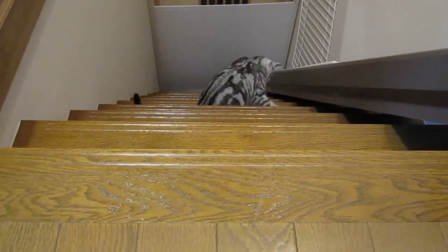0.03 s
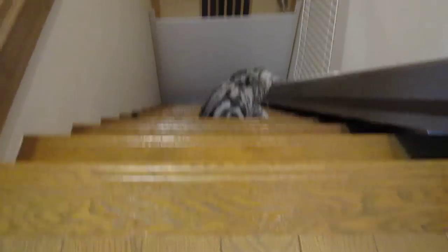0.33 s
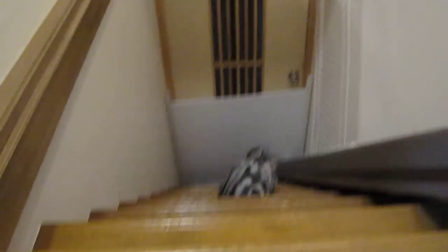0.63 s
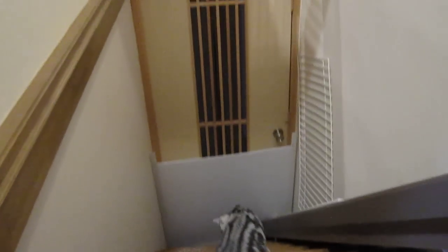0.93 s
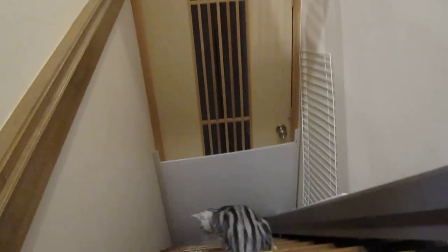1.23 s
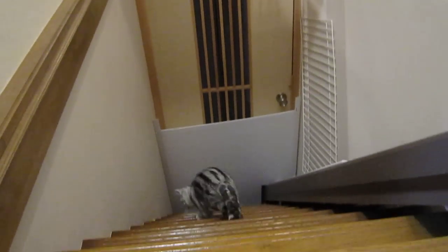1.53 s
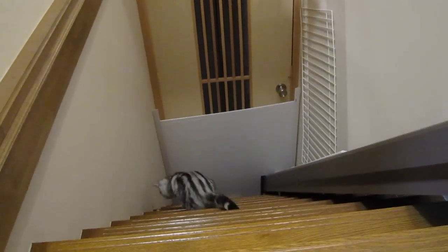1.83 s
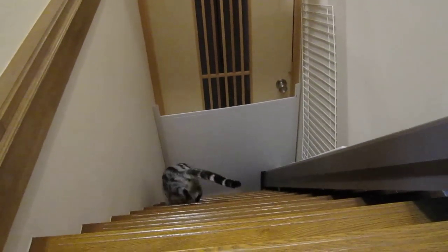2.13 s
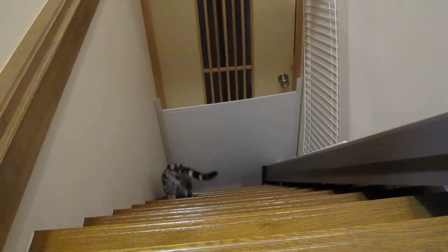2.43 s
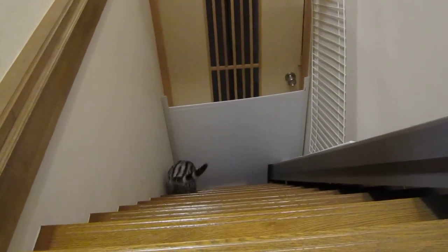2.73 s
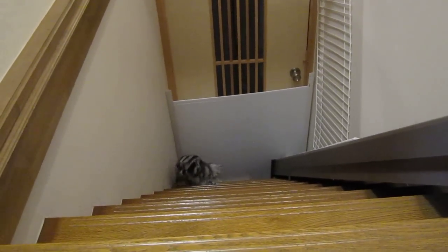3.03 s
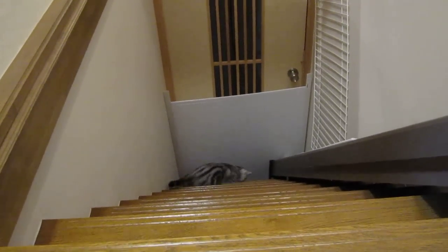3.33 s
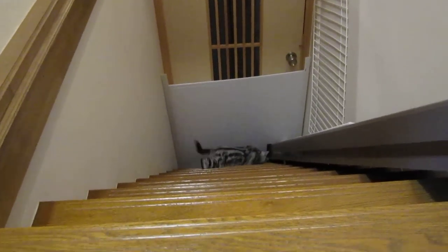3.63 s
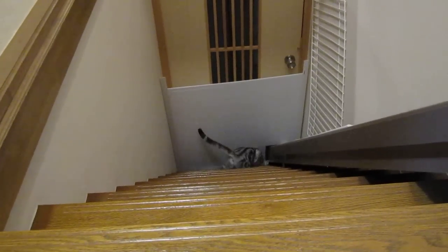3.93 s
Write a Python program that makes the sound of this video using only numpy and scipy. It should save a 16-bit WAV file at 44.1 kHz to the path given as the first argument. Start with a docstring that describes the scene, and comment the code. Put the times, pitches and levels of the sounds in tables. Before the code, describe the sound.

Sharp clicks of a little hard object tumbling down a wooden staircase, over a low hum.

```python
"""Quiet room air and a low hum that sinks in pitch, heard from the top of a wooden staircase.
A cat scuffs and pads; a low handling bump and a few dry ticks sound close by. A small hard object
bounces down the stairs: each click comes weakly round the stair edges, then strongly off the walls,
with the object's thin high ring and a stairwell tail."""
import sys
import numpy as np
from scipy import signal
from scipy.fft import rfft, irfft, next_fast_len
from scipy.io import wavfile

SR = 44100
rng = np.random.default_rng(int(sys.argv[2]) if len(sys.argv) > 2 else 0)


def to_wav(s):
    """Save 16-bit WAV."""
    ch = np.atleast_2d(s).T  # columns
    pcm = np.round(np.clip(ch, -1, 1) * 32767)  # PCM
    wavfile.write(sys.argv[1], SR, pcm.astype(np.int16))


N = 176400


def undb(db):
    return 10 ** (np.asarray(db) / 20)


def unit(x):
    """Scale to energy 1."""
    return x / np.sqrt(np.sum(x ** 2) + 1e-18)


def curve(hz, points):
    """Read (Hz, value) points on a log-frequency axis."""
    knot_hz, values = np.array(points, float).T
    return np.interp(np.log(np.maximum(hz, 1)), np.log(knot_hz), values)


def eq(x, gain_db):
    """Minimum-phase EQ that follows gain_db(Hz)."""
    n = 2 * next_fast_len(len(x))
    hz = np.arange(n // 2 + 1) * SR / n
    cepstrum = irfft(np.log(undb(gain_db(hz))), n)
    cepstrum[1:n // 2] *= 2
    cepstrum[n // 2 + 1:] = 0
    return irfft(rfft(x, n) * np.exp(rfft(cepstrum)), n)[:len(x)]


def noise_band(n, hz, octaves):
    """Noise of rms 1 in a bell-shaped band."""
    f = np.maximum(np.arange(n // 2 + 1) * SR / n, 1)
    bell = np.exp(-.5 * (np.log2(f / hz) / octaves) ** 2)
    return unit(irfft(rfft(rng.standard_normal(n)) * bell, n)) * np.sqrt(n)


def modes(table, t):
    """Decaying sines from (Hz, dB, t60) rows."""
    return sum(undb(db) * np.sin(2 * np.pi * hz * t) * np.exp(-np.log(1000) * t / t60)
               for hz, db, t60 in table)


def add(out, start, x):
    """Mix x in at start seconds."""
    i = int(start * SR)
    out[i:i + len(x)] += x[:N - i]


# Tone of the room air: (frequency [Hz], relative level [dB])
AIR_EQ = [(110, -22), (180, -15.5), (506, -18.5), (2110, -22.5), (16000, -44.5)]

def room_air():
    """A quiet noise bed with one soft stairwell resonance."""
    air = unit(eq(rng.standard_normal(N), lambda f: curve(f, AIR_EQ))) * np.sqrt(N)
    return undb(-52.5) * air + undb(-58) * noise_band(N, hz=258, octaves=0.14)


# Glide and swells of the hum: (time [s], pitch [Hz], level [dB])
HUM = [(0, 61.54, -44), (.6, 57.24, -52.5), (1.649, 46.2, -39), (2.169, 42.34, -43), (2.401, 41.34, -36.5),
       (2.65, 39.44, -39.5), (2.95, 36.14, -32.5), (3.5, 34.9, -41), (4., 40.7, -31)]
# Fade of the rumble: (time [s], level [dB])
RUMBLE = [(2.3, -52), (2.55, -58.5)]

def hum():
    """A wavering low tone sinks, then lifts at the end; its octave and a rumble drop back midway."""
    t = np.arange(N) / SR
    times, hz, db = np.array(HUM).T
    phase = 2 * np.pi * np.cumsum(np.interp(t, times, hz)) / SR
    waver_db = 1.6 * noise_band(N, hz=7.4, octaves=1)
    tone = np.sqrt(2) * undb(np.interp(t, times, db) + waver_db) * np.sin(phase)
    rumble = noise_band(N, hz=82, octaves=1) + np.sin(2 * phase)
    return tone + undb(np.interp(t, *np.array(RUMBLE).T)) * rumble


# Reverb time of the stairwell: (frequency [Hz], t60 [s])
STAIRWELL_T60 = [(200, 0.31), (600, 0.45), (1400, 0.48), (4000, 0.37), (7000, 0.4), (10000, .31),
                 (15000, 0.16)]

def stairwell(t, rise_s=0.0038):
    """Diffuse tail of energy 1: it builds up, then the top dies first."""
    f = np.arange(len(t) // 2 + 1) * SR / len(t)
    spectrum = rfft(rng.standard_normal(len(t)))
    edges = np.r_[0, np.geomspace(200, SR / 2, 24)]
    tail = np.zeros(len(t))
    for low, high in zip(edges, edges[1:]):
        t60 = curve((low + high) / 2, STAIRWELL_T60)
        tail += irfft(spectrum * (f >= low) * (f < high), len(t)) * np.exp(-np.log(1000) * t / t60)
    return unit(tail * (1 - np.exp(-t / rise_s)))


# The cat's scuffs: (peak time [s], level [dB], centre [Hz], width [octaves], half length [s])
SCUFFS = [(0.155, -49.5, 5070, 0.73, 0.026), (0.514, -43, 2870, 0.86, 0.04), (1.37, -38, 296, 1, 0.07),
          (1.486, -42.5, 2860, 0.63, 0.072)]
# A low handling bump, then soft paw thumps and knocks on the treads:
# (time [s], level [dB], centre [Hz], width [octaves], decay [s])
THUMPS = [(.39, -32.5, 44.3, 0.57, 0.063), (.701, -27.5, 240, 0.36, 0.012),
          (.702, -29.5, 830, 0.064, 0.023), (1.349, -35, 72.6, 0.69, 0.093), (1.409, -29, 233, 0.28, 0.015),
          (1.482, -30.5, 870, 0.28, 0.058), (1.525, -35.5, 244, 0.31, 0.052),
          (2.259, -23.5, 270, 0.64, 0.0061), (3.062, -36.5, 281.5, 0.18, .02),
          (3.372, -37, 195, 0.38, 0.017), (2.906, -37, 590, 0.34, 0.013), (3.72, -34, 526, 0.14, 0.069),
          (3.75, -38, 150, 2.1, 0.13), (3.912, -31.5, 477, 1.07, 0.082), (3.955, -32, 827, 0.31, 0.091)]

def scuffs_and_thumps(attack_s=0.0018, reverb_db=-9):
    """Cat scuffs, a low handling bump, then paw thumps and knocks on the treads, all with reverb."""
    out, t = np.zeros(N), np.arange(SR // 2) / SR
    for start, db, hz, octaves, decay in THUMPS:
        envelope = (1 - np.exp(-t / attack_s)) * np.exp(-t / decay)
        thump = unit(noise_band(len(t), hz, octaves) * envelope) * np.linalg.norm(envelope)
        add(out, start, undb(db) * thump)
    for peak, db, hz, octaves, half_length in SCUFFS:
        swell = np.exp(-.5 * ((np.arange(N) / SR - peak) / half_length) ** 2)
        out += undb(db) * noise_band(N, hz, octaves) * swell
    return out + undb(reverb_db) * signal.fftconvolve(out, stairwell(t))[:N]


# Tick cues: (time [s], peak level [dB])
TICKS = [(0.6368, -22), (0.6909, -22.5), (0.796, -23), (0.819, -20.5), (.831, -26), (.844, -20.5),
         (0.857, -18), (1.026, -21.5)]
# Hollow body of a tick: (frequency [Hz], relative level [dB], t60 [s])
TICK_MODES = [(1213, 9, 0.039), (1366, 19.5, 0.017), (1760, 6, 0.015), (2800, 4, 0.011)]

def ticks(crack_db=6.5, crack_decay_s=0.0013):
    """Tiny close clicks without reverb: a crack of noise over a hollow body."""
    out, t = np.zeros(N), np.arange(SR // 20) / SR
    for start, db in TICKS:
        crack = noise_band(len(t), hz=2500, octaves=1) * np.exp(-t / crack_decay_s)
        tick = modes(TICK_MODES, t) + undb(crack_db) * crack
        add(out, start, undb(db) * tick / np.abs(tick).max())
    return out


def wood_db(hz, ripple_db=4.5, spacing_hz=129.6):
    """Every tread has its own resonances: random peaks and dips."""
    grid = np.arange(256) * spacing_hz
    return ripple_db * np.interp(hz, grid, rng.uniform(-1.12, 1, len(grid)))


def comb_db(hz, delay_ms, rolloff_hz=9000):
    """A comb delay colours a click with notches; the shortest delays just dull the treble."""
    strength = 0.5 * (delay_ms > 0) * np.exp(-(hz / rolloff_hz) ** 2)
    return 20 * np.log10(np.abs(1 + strength * np.exp(2j * np.pi * hz * delay_ms / 1000)))


# The object's thin high modes: (frequency [Hz], relative level [dB], t60 [s])
RING_MODES = [(9700, -2, 0.069), (9773, 4.5, 0.074), (9860, -2, 0.076), (11710, -8.5, 0.048)]

def ring(t, since_walls, paths, detune=0.00085, direct_gain=0.61):
    """The object rings, straight and by reflected paths, at a slightly different pitch each blow."""
    partials = [(hz * (1 + detune * rng.standard_normal()), db, t60) for hz, db, t60 in RING_MODES]
    reflected = unit(signal.fftconvolve(modes(partials, t), paths)[:len(t)])
    direct = unit(modes(partials, np.maximum(since_walls, 0)))
    return unit(reflected + direct_gain * direct)


# Hits on the stairs: (time [s], wall lag [ms], clatter decay [ms], click gain [dB], bass [dB],
# treble [dB], top [dB], ring level [dB], tail send [dB], comb delay [ms; 0 for none])
BOUNCES = [(.701, 7.3, 9.2, 14, -1, -3, -21.5, 5.5, -5, 0),
           (.846, 5.3, 22, 4.5, 0, -1.5, -25, -7.5, -4.5, 0.043),
           (.939, 6.2, 16, 5.5, 4.5, -1, -16, 1, -2.5, 0), (1.107, 8, 13, 9, -0.5, -8.5, -38, -10, -3, 0),
           (1.229, 7.4, 8.6, 6, -3.5, -4, -7.5, 1, -3, 0),
           (1.34, 5.3, 24, 2.5, 1, 2.5, -10, -0.5, -1.5, 0.066),
           (1.452, 6.3, 16, 3.5, -2.5, -12.5, -8, 0, -2, 0.064),
           (1.699, 4.5, 14, 8.5, -5, -0.5, -13, 9.5, -6, 0.55),
           (1.931, 4.4, 12, 6.5, 2, 4, -7, 1, -6.5, 0.51),
           (2.225, 3.44, 5.5, 13.5, -5, -4, -15, 6, -5.5, 0.7),
           (2.457, 0.69, 10, -9, -5, 0, -14, -15.5, -3.5, 0.071),
           (2.552, .4, 6, 8, 2, 2, -6.5, 7.5, -10.5, 0.2),
           (2.811, 1.9, 10, 9.5, -2, -2.5, -18, 2.5, -8, 0.046),
           (2.897, 1.7, 9.5, 7, -2.5, 1, -29, -17, -6.5, 0.09),
           (3.079, 1.26, 17.3, 10, -3.5, -4.5, -29, -11.5, -9.5, 0.048),
           (3.3298, 0.65, 2.7, 9.5, 1.5, 1.5, -17.5, 1.5, -6.5, 0.24),
           (3.692, 3.5, 13, 13, -6, -0.5, -13.5, -15, 1, 0),
           (3.712, 1.45, 27, 11, -2.5, -3.5, -18.5, -10, -2, 0),
           (3.856, 0.63, 6, 4, -3, -5, -32, -24, 0.5, 0.076),
           (3.935, .5, 20, 11, 1.5, -10.5, -30, -17, 1, 0)]
# EQ centres for each hit: (bass [Hz], middle [Hz], treble [Hz], top [Hz])
BAND_HZ = [1300, 3200, 6600, 14000]
# Tread tone shared by all clicks: (frequency [Hz], gain [dB])
TREAD_EQ = [(60, -28.5), (260, -4), (450, -14.5), (680, -6.5), (900, -1.5), (1500, -2), (6500, 3.5),
            (16000, 0)]
# Tone of the stairwell tail: (frequency [Hz], gain [dB])
TAIL_EQ = [(200, 6), (1500, 5.5), (5000, 2.5), (8000, -1), (11000, 5.5), (15000, 1)]

def bounces(lead_db=-8.5, ring_tail_db=-1):
    """Each hit arrives as a weak lead bent round the stair edges, a burst off the walls and a tail."""
    out, t = np.zeros(N), np.arange(SR // 2) / SR
    for start, lag_ms, decay_ms, click_db, bass, treble, top, ring_db, tail_db, comb_ms in BOUNCES:
        since_walls = t - lag_ms / 1000
        clatter = np.exp(-np.abs(since_walls) / (decay_ms / 1000))
        envelope = np.where(since_walls < 0, undb(lead_db), clatter)
        early = unit(rng.standard_normal(len(t)) * envelope)
        tail = undb(tail_db) * eq(stairwell(t), lambda f: curve(f, TAIL_EQ))
        hit_eq = list(zip(BAND_HZ, (bass, 0, treble, top)))
        knock = unit(eq(early + tail, wood_db))
        click = eq(knock, lambda f: curve(f, hit_eq) + curve(f, TREAD_EQ) + comb_db(f, comb_ms))
        add(out, start, undb(click_db) * click)
        ring_paths = early + undb(ring_tail_db) * tail  # the ring loses more in the stairwell
        add(out, start, undb(ring_db) * ring(t, since_walls, ring_paths))
    return out


def scene():
    """All layers in a mono mix."""
    return (bounces() + scuffs_and_thumps() + ticks() + hum() + room_air())[None]


def record(dry, cutoff_hz=15900):
    """A steep low-pass takes off the very top."""
    return signal.sosfilt(signal.ellip(10, .2, 80, cutoff_hz, fs=SR, output="sos"), dry)


dry = scene()
out = record(dry)
to_wav(out)
```